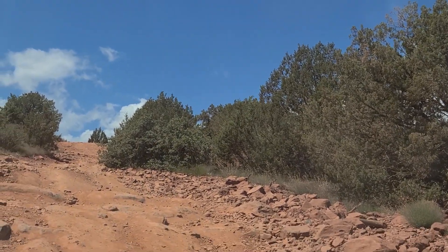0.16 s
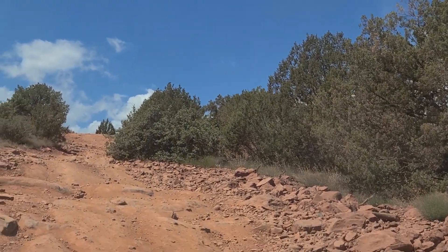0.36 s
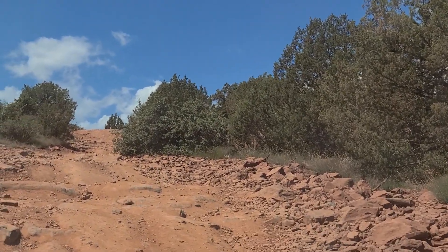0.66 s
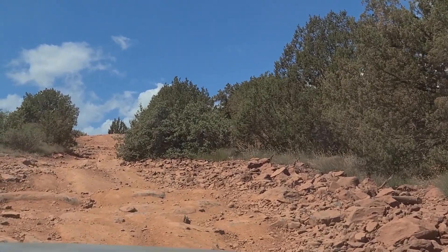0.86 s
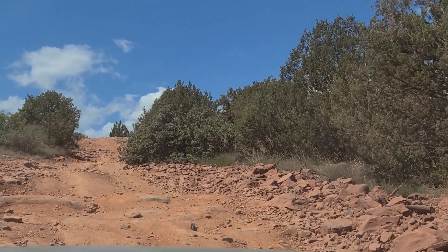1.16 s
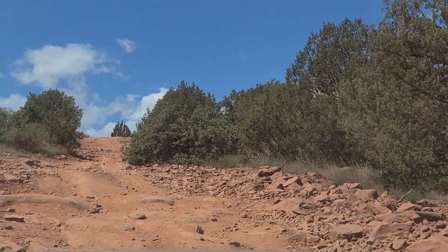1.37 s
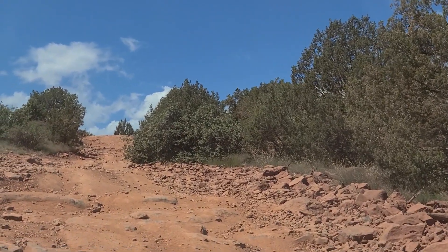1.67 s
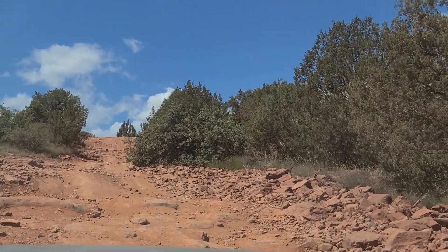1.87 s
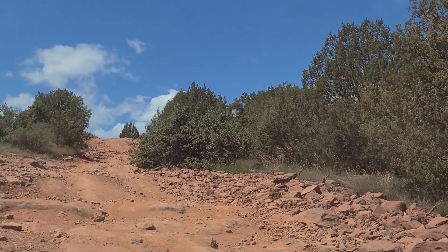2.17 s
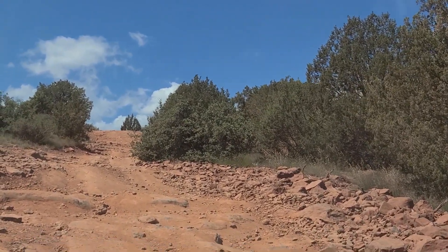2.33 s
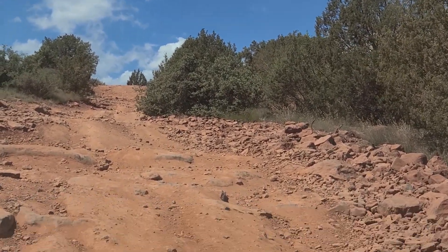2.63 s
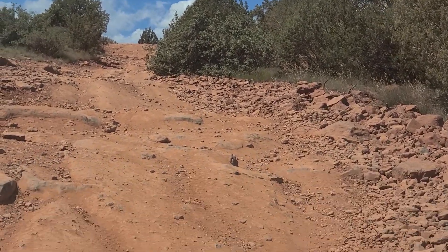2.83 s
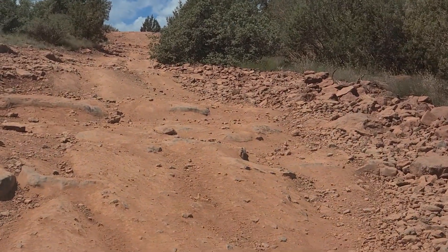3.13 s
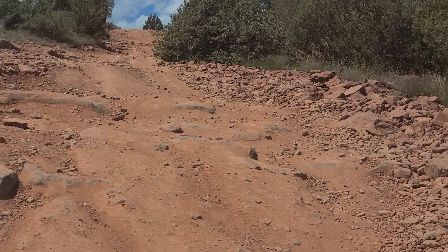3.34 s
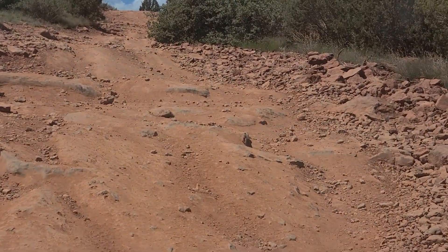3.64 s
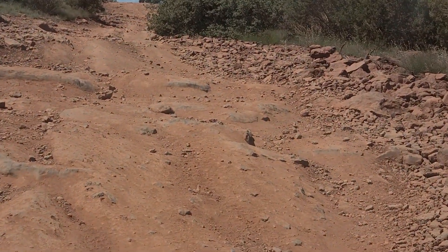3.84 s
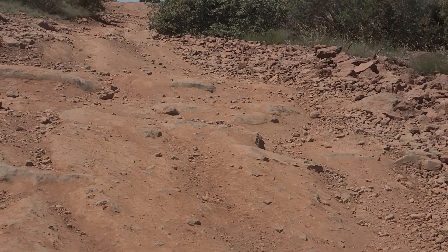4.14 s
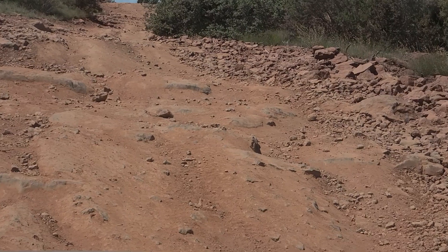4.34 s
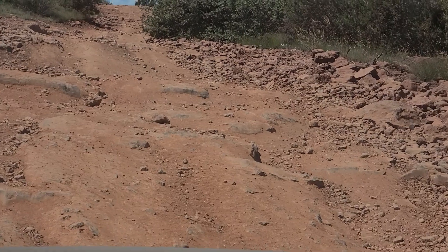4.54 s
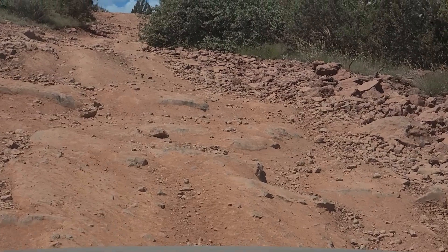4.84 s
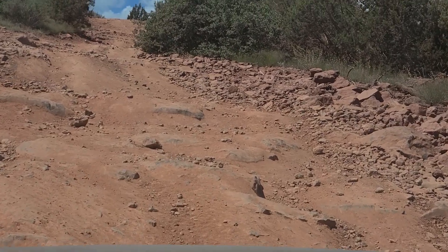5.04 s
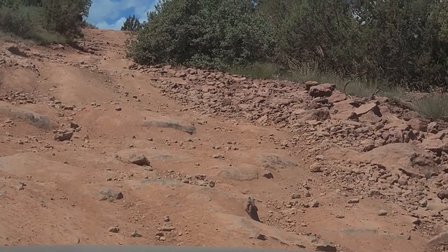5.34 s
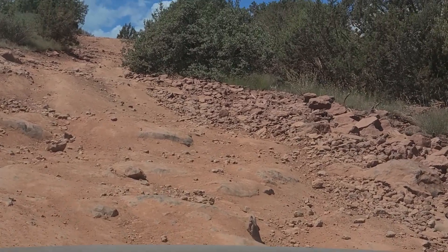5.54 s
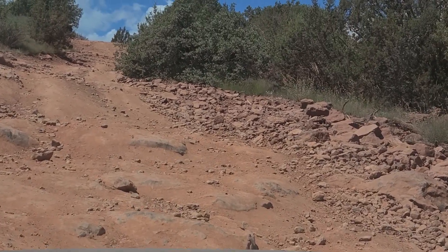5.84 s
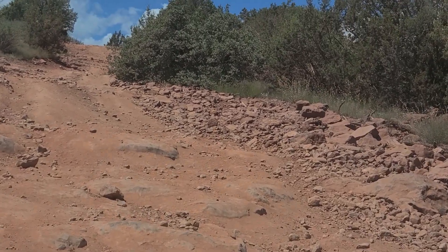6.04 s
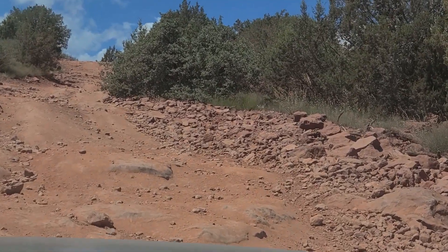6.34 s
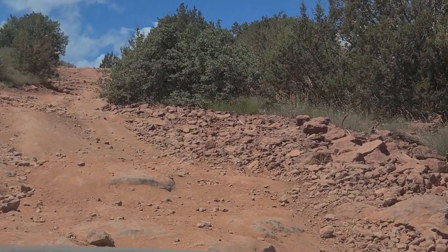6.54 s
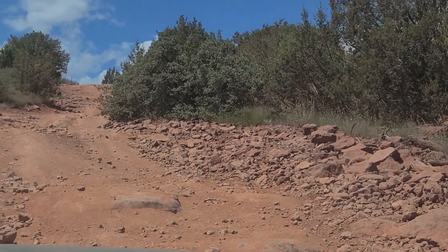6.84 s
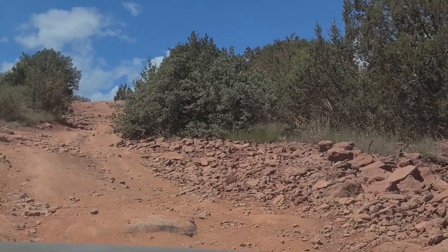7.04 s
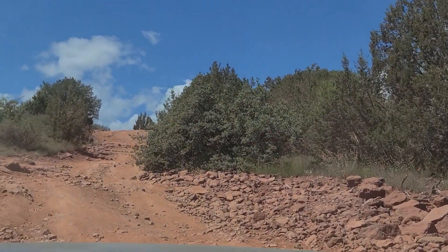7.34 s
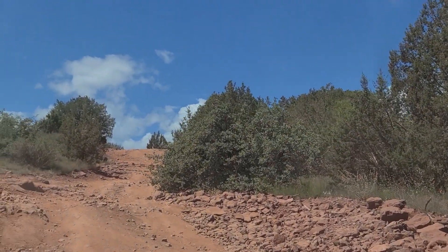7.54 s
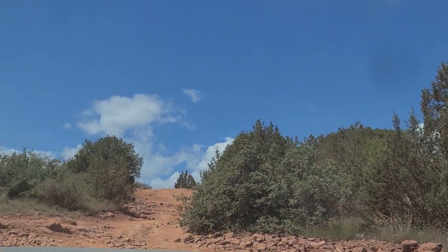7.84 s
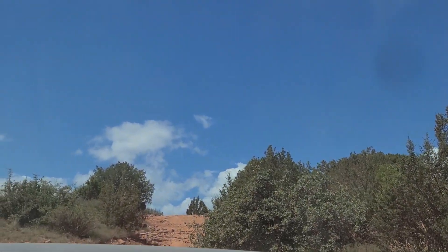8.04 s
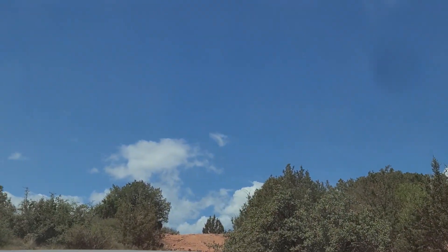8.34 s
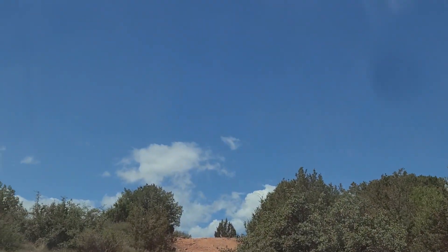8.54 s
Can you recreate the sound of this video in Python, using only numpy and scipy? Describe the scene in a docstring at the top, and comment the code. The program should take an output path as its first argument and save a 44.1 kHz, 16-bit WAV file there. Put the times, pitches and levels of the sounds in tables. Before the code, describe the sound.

Low engine hum climbs and falls as a truck crawls over rocky dirt, with gritty tyre crunch, cracking stones, hollow underbody knocks and faint rubber squeals.

```python
"""Truck crawling up a rocky trail

Heard by a camera inside the cab of a six-cylinder truck on a rocky dirt trail, left window open.
Sine tones on the crank orders and whines follow the engine; coloured noise makes the cab's deep heave
and drumming, and, modulated by dense pops, the tyres' crunch, hiss and whirr by the window.
Short decaying rings and noise bursts make cracking stones, pings, and knocks and bumps under the floor;
wavering sines squeal as rubber slips on rock."""
import sys
import numpy as np
from scipy import signal
from scipy.fft import rfft, irfft, next_fast_len
from scipy.io import wavfile
from scipy.ndimage import uniform_filter1d

SR = 44100
rng = np.random.default_rng(int(sys.argv[2]) if len(sys.argv) > 2 else 0)


def dump_mix(stems):
    """Bounce the given channels to the path in sys.argv[1] as a 16-bit WAV at rate SR."""
    frames = np.atleast_2d(stems).T  # one column per channel
    limited = np.clip(frames, -1, 1)  # hard clip at full scale
    pcm = np.round(limited * 32767).astype(np.int16)
    wavfile.write(sys.argv[1], SR, pcm)


N = 383669

# engine over the climb: t/s, firing rate f/Hz, firing tone level/dB, drive-line load level/dB
ENGINE_RUN = [(0.0, 50.77, -10, -6.5), (0.36, 53.24, -12, -4), (0.6, 51.77, -12, -7.5),
              (1.34, 55.57, -10.5, -3), (1.6, 60, -6, -1), (2.13, 61.66, -8.5, -3),
              (2.4, 61.27, -7.5, -2.5), (2.69, 63.66, -9.5, -4), (3.04, 61.93, -9, -3.5),
              (3.45, 64.07, -12, -6.5), (3.95, 64.35, -10, -5.5), (4.86, 71.34, -14, 0),
              (5.12, 71.8, -14.5, -3.5), (5.36, 70.4, -15, -7), (5.51, 67.93, -7.5, -4.5),
              (5.72, 63.96, -5, -4), (5.96, 60.76, -4.5, -14), (6.03, 57.9, -12, -1.5),
              (6.2, 50.46, -9, -8), (6.5, 42.74, -28, -2), (6.72, 40.74, -26, -5), (7.0, 40.58, -18, -4.5),
              (7.31, 37.64, -22, -5.5), (7.77, 35.35, -18, -6), (7.96, 36.88, -14.5, -4.5),
              (8.14, 37.33, -18, -4.5), (8.42, 35.03, -23, -5.5), (8.7, 34.6, -24, -6)]
# rolling over the trail: t/s, road noise level/dB, deep rumble level/dB
TRAIL = [(0.0, -0.5, -33), (1.1, 1, -24), (1.9, 2.5, -17), (2.6, 1, -20.5), (3.6, 3.5, -17.5),
         (4.0, 1, -25), (5.1, 2.5, -21.5), (5.7, 1.3, -17.5), (6.1, 0.5, -37), (6.9, -4, -24),
         (7.4, -4.5, -28), (7.9, -3.5, -46), (8.15, 1.5, -25), (8.7, -5, -27)]

# left minus right, dB
BASS_PAN_DB, CRUNCH_PAN_DB, HISS_PAN_DB, WHIRR_PAN_DB = 1.1, 6, 5, 1
# levels at road noise 0 dB, and dB gained for each dB of road noise
DRUM_DB, DRUM_SLOPE = -33.5, 0.79
CRUNCH_DB, CRUNCH_SLOPE = -50, 0.92
HISS_DB, HISS_SLOPE = -58, 1.4
WHIRR_DB, WHIRR_SLOPE = -44, 1.13
HIT_T = np.arange(int(.16 * SR)) / SR  # time axis of one blow, s


def undb(db):
    """dB to gain."""
    return 10 ** (np.asarray(db) / 20)


def curves(table):
    """Columns of a table, one value per sample."""
    s, *columns = np.transpose(table)
    return [np.interp(np.arange(N) / SR, s, c) for c in columns]


def on_log(hz, table):
    """A (Hz, value) table read on a log-frequency axis."""
    table_hz, values = np.array(table).T
    return np.interp(np.log(hz + 1), np.log(table_hz), values)


def walk(rate):
    """Random levels held 1 / rate s and smoothed twice; spread about 1.4."""
    k = int(SR / rate)
    held = np.repeat(rng.standard_normal(N // k + 1), k)
    return 1.83 * uniform_filter1d(uniform_filter1d(held, k), k)[:N]


def band(x, lo_hz, hi_hz):
    """Band-pass."""
    return signal.sosfilt(signal.butter(2, [lo_hz, min(hi_hz, .45 * SR)], "band", fs=SR, output="sos"), x)


def panned(pan_db):
    """Left and right gains, as a column."""
    return undb(np.array([[pan_db], [-pan_db]]) / 2)


def stereo(colour, lo_hz, hi_hz, grains=0):
    """Coloured noise at two ports, rms 1 from lo to hi: a shared part, late at the right, and unrelated parts."""
    # likeness of the two microphone ports: f/Hz, shared share of power (0-1)
    likeness = [(30, 0.98), (70, 1), (125, 0.85), (250, 0.99), (500, 0.78), (1200, 0.45), (3000, 0.03),
                (12000, 0.08)]
    port_lag = 19.7  # samples, shrinking below 400 Hz
    size = next_fast_len(N)
    hz = np.arange(size // 2 + 1) * SR / size
    shared, left, right = rfft(rng.standard_normal((3, N)) * (1 + grains), size)
    like = np.clip(on_log(hz, likeness), 0, 1)
    late = np.exp(-2j * np.pi * hz * port_lag / SR * np.clip(hz / 400, 0, 1))
    pair = np.sqrt(like) * shared * np.array([late ** 0, late])
    pair = pair + np.sqrt(1 - like) * np.array([left, right])
    pair = pair * undb(on_log(hz, colour))
    inside = (hz > lo_hz) & (hz < hi_hz)
    return irfft(pair, size)[:, :N] / irfft(pair * inside, size)[:, :N].std()


def cab_lift_db(hz):
    """Cab resonances lift a tone passing through them."""
    # cab resonances: f/Hz, width/Hz, level/dB
    resonances = [(68.7, 6.3, 13), (101, 7, 0), (125.4, 7.9, 5), (138.2, 12.5, 8), (166, 13, 6.5),
                  (185.7, 11.2, 7.5), (206.2, 8.1, 7.5), (243.4, 8.1, 2.5), (286, 15, 5), (355, 7, 7.5),
                  (426, 17, 9.5)]
    return sum(db / (1 + (2 * (hz - centre) / width) ** 2) for centre, width, db in resonances)


def crank_tone(k, db, hz):
    """A sine at k times the crank rate; uneven firings make it waver in level and phase."""
    crank = 2 * np.pi * np.cumsum(hz) / SR / 3  # three firings a turn
    phase = k * crank + rng.uniform(0, 2 * np.pi) + .15 * walk(5)
    skew = min(0.0015 * k ** 2, .45) * walk(1.5)  # higher orders reach the two ports differently
    waver_db = (1.2 if k < 22 else 1.4) * walk(6)
    tone = np.sin(phase + np.array([skew, -skew]))
    pan_db = BASS_PAN_DB + min(0.12 * k, 1.5) * (k > 3)
    return np.sqrt(2) * undb(db + waver_db) * tone * panned(pan_db)


def engine():
    """The firing tone and other crank orders, which follow load, lugging and the cab's resonances."""
    # multiples of the crank rate that sound beside the firing tone
    multiples = (2, 4, 4.5, 5, 6, 7, 8, 9, 10, 11, 12, 13, 14, 15, 16, 18, 20, 21)
    # for each multiple: level/dB, lift when the engine lugs/dB
    order_levels = [(-20.5, -0.5), (-30, 3.5), (-39.5, 14.5), (-28.5, -6), (-26.5, 8), (-40.5, 3.5),
                    (-30.5, -12), (-31.5, 4.5), (-37.5, -21), (-34.5, -3.5), (-32.5, 8.5), (-35, -5.5),
                    (-53.5, 7.5), (-37.5, 5), (-41.5, 1), (-51.5, 12.5), (-52.5, 21.5), (-42.5, 5)]
    lug_below_hz, lug_range_hz = 57.6, 19.7  # firing rate where lugging begins, and how far down it is full
    firing_load = 1.48  # multiples of the firing rate follow the load this much more steeply
    hz, firing_db, load_db = curves(ENGINE_RUN)
    lug = np.clip((lug_below_hz - hz) / lug_range_hz, 0, 1)
    out = crank_tone(3, firing_db, hz)
    for k, (db, lug_db) in zip(multiples, order_levels):
        load_share = 1 if k % 3 else firing_load
        level_db = db + lug_db * lug + load_db * load_share + cab_lift_db(k * hz / 3)
        out += crank_tone(k, level_db, hz)
    return out


def whines():
    """Belt and gear whines at high crank multiples, louder as the engine speeds up."""
    # whines: multiple of the crank rate, level/dB at 65 firings a second, lift while the revs fall/dB
    whine_table = [(24, -50, 0), (28, -51, 0), (36, -54, 0), (40, -51, 5), (45, -63, 13), (48, -60, 0),
                   (54, -55.5, 0), (60, -58, 8)]
    whine_db_per_hz = .18  # per Hz of firing rate
    overrun_hz_per_s = 18  # fall of the firing rate at which the lift is full
    hz = curves(ENGINE_RUN)[0]
    slope = uniform_filter1d(np.gradient(hz) * SR, SR // 10)
    overrun = np.clip(-slope / overrun_hz_per_s, 0, 1)
    out = np.zeros((2, N))
    for k, db, overrun_db in whine_table:
        level_db = db + whine_db_per_hz * (hz - 65) + overrun_db * overrun + cab_lift_db(k * hz / 3)
        out += crank_tone(k, level_db, hz)
    return out


def body():
    """The cab heaves in the deep bass and its panels drum with road and exhaust noise."""
    # deep colour: f/Hz, level/dB per Hz
    heave_colour = [(8, -65), (17, -24), (24, -5), (33, -6), (44, -4.5), (53, -2), (66, -14), (80, -14),
                    (120, -75)]
    # drumming colour: f/Hz, level/dB per Hz
    drum_colour = [(47, -8), (80, -10), (112, -16.5), (161, -15), (240, -17), (310, -21), (388, -20.5),
                   (602, -27), (773, -26.5), (1020, -36), (1230, -31), (1600, -50), (2080, -64),
                   (3520, -120)]
    road_db, deep_db = curves(TRAIL)
    deep = stereo(heave_colour, 20, 45) * undb(deep_db) * panned(BASS_PAN_DB)
    drum_db = DRUM_DB + DRUM_SLOPE * road_db + 0.54 * walk(20)
    drum = stereo(drum_colour, 300, 900) * undb(drum_db) * panned(1.3)
    return deep + drum


def tyres():
    """Dense grit crushed under the tread, as noise swelled by decaying pops, over a steadier whirr."""
    # crunch colour: f/Hz, level/dB per Hz
    crunch_colour = [(1060, -28.5), (1800, -10), (1870, -13.5), (2840, -4), (3190, -3.5), (3490, -3),
                     (5470, -6), (8500, -27), (11000, -40), (18700, -120)]
    # bright hiss colour: f/Hz, level/dB per Hz
    hiss_colour = [(4120, -15), (7000, 0.5), (8030, -17.5), (8760, -9), (11500, -3.5), (14400, -5.5),
                   (15600, -10.5)]
    # whirr colour: f/Hz, level/dB per Hz
    whirr_colour = [(590, -39), (1000, -28.5), (1330, -1), (1520, -4.5), (1870, -3.5), (2970, -7.5),
                    (3100, -10), (6840, -28), (8000, -37.5), (10400, -69), (17600, -120)]
    crunch_gain, hiss_gain, whirr_gain = tyre_gains()
    # 120 pops a second on average, each dying away over 21 ms
    pops = (rng.random(N) < 120 / SR) * undb(np.minimum(3 * rng.exponential(1, N), 9))
    grains = signal.lfilter([1], [1, -np.exp(-1 / (0.021 * SR))], 0.1 * pops)
    flicker_db = 0.4 * walk(15)
    # the limits in Hz are the bands in which the levels hold
    crunch = stereo(crunch_colour, 3500, 7000, grains) * crunch_gain * undb(flicker_db)
    hiss = stereo(hiss_colour, 9000, 15500, grains) * hiss_gain * undb(flicker_db + 0.6 * walk(11))
    whirr = stereo(whirr_colour, 1100, 2600, grains) * whirr_gain * undb(0.42 * walk(12))
    return crunch * panned(CRUNCH_PAN_DB) + hiss * panned(HISS_PAN_DB) + whirr * panned(WHIRR_PAN_DB)


def fade(t60, rise=.0006):
    """A blow's envelope: a rise (time constant, s), then a decay of 60 dB in t60 s."""
    return np.exp(-np.log(1000) * HIT_T / t60) * (1 - np.exp(-HIT_T / rise))


def peaked(x):
    """Scales a sound to peak 1."""
    return x / np.abs(x).max()


def add(out, s, sound, db, pan_db):
    """Places a sound at s seconds with its peak level, before panning, in dB."""
    i = int(s * SR)
    sound = sound[:, :N - i]
    out[:, i:i + sound.shape[1]] += peaked(sound) * undb(db) * panned(pan_db)


def cracks():
    """Stones crack under the tread: short bursts of noise with a brighter part."""
    # cracks: t/s, peak level/dB, centre f/Hz, bright part level/dB
    crack_table = [(0.15, -27.5, 3140, -50), (0.556, -26.5, 3670, -32), (1.361, -31.5, 3350, -54),
                   (1.4293, -40, 2460, -47), (1.6404, -18, 3700, -23), (1.8305, -22, 3300, -58),
                   (2.3228, -33, 2420, -52), (3.309, -35, 2929, -29), (3.431, -30, 2010, -48),
                   (4.3303, -24, 2054, -49), (4.4323, -25.5, 4570, -45), (4.519, -41, 2547, -31),
                   (5.206, -24.5, 2426, -54), (5.7489, -35, 2190, -53), (5.9296, -40, 2130, -31),
                   (6.047, -28, 4260, -45), (6.096, -33, 3070, -38), (6.5994, -45, 2050, -38),
                   (6.8908, -24, 2804, -23), (7.0946, -30, 3438, -24), (7.119, -32, 2474, -40),
                   (8.0411, -23, 4000, -32), (8.263, -25, 3310, -54)]
    out = np.zeros((2, N))
    for s, db, hz, bright_db in crack_table:
        puff = rng.standard_normal((2, 2, len(HIT_T)))
        add(out, s, band(puff[0], 0.6 * hz, 1.44 * hz) * fade(0.092), db, CRUNCH_PAN_DB)
        add(out, s, band(puff[1], 8100, 20000) * fade(0.043, 0.0021), bright_db, HISS_PAN_DB)
    return out


def tyre_gains():
    """Gains of crunch, hiss and whirr: the road's share plus, in power, each uneven slip or grind."""
    # a wheel slips on grit: start t/s, length/s, crunch level/dB, bright hiss level/dB
    slip_table = [(0.375, 0.21, -52, -57), (1.398, 0.1, -51, -49.5), (1.52, 0.15, -46, -43.5),
                  (1.82, 0.29, -49.5, -58), (3.221, 0.086, -47, -55), (3.414, 0.21, -37, -43.5),
                  (3.64, 0.18, -48.5, -58), (4.328, 0.21, -47, -50.5), (4.68, 0.21, -48.5, -58),
                  (5.69, 0.069, -56, -52), (6.03, 0.22, -44, -48.5), (6.753, 0.19, -48, -50),
                  (6.966, 0.23, -48, -61), (7.074, 0.042, -36.5, -38.5), (7.133, 0.24, -45.5, -55),
                  (7.582, 0.08, -65, -60), (7.96, 0.065, -52, -70), (8.102, 0.28, -50.5, -70)]
    # coarse gravel grinds under a wheel: start t/s, length/s, level/dB
    grind_table = [(7.56, .14, -52.5), (7.847, 0.11, -49.5), (7.995, 0.082, -44), (8.11, 0.061, -42)]
    attack_s, release_s = 0.024, 0.033
    gritty_db, gritty_rate = 1.1, 140  # scale of the unevenness, changes a second
    t, road_db = np.arange(N) / SR, curves(TRAIL)[0]
    steady_db = [CRUNCH_DB + CRUNCH_SLOPE * road_db,
                 HISS_DB + HISS_SLOPE * road_db,
                 WHIRR_DB + WHIRR_SLOPE * road_db]
    power = undb(steady_db) ** 2
    grip = undb(gritty_db * np.array([scale * walk(gritty_rate) for scale in (1, 1, 2.5)]))

    def shape(start, length):
        """Straight attack, hold, and straight release after the length."""
        release = 1 + (start + length - t) / release_s
        return np.clip(np.minimum((t - start) / attack_s, release), 0, 1)

    for start, length, *db in slip_table:
        power[:2] += (np.outer(undb(db), shape(start, length)) * grip[:2]) ** 2
    for start, length, db in grind_table:
        power[2] += (undb(db) * shape(start, length) * grip[2]) ** 2
    return np.sqrt(power)


def ring_modes(modes, detune, gains_db, rise):
    """Sum of decaying sines, detuned apart at each port, all starting together."""
    return sum(undb(g) * np.sin(2 * np.pi * f * d * HIT_T) * fade(t60, rise)
               for (f, _, t60), d, g in zip(modes, detune, gains_db))


def knocks():
    """Stones and suspension ring the floor modes nearest each knock's centre, and rattle on."""
    # knocks: t/s, peak level/dB, centre f/Hz, upper ring level/dB, left minus right/dB
    knock_table = [(.738, -26.5, 800, -22.5, 3), (1.109, -14, 389.6, -43, 0),
                   (1.158, -7.5, 432.6, -21.5, -1.5), (1.935, -9, 426, -26, 2), (2.623, -22, 666.5, -51, 2),
                   (2.824, -22, 454, -30, 8), (2.83, -17, 420, -31, 5), (2.839, -16, 420, -40, 0),
                   (2.853, -14, 463, -38, 6), (2.867, -18, 400, -36, 6), (2.879, -15, 399.8, -28, 6),
                   (2.956, -19, 899, -21.5, 2.5), (3.371, -13.5, 420, -44, 13), (3.399, -18, 670, -38, 0),
                   (4.0, -22, 480.6, -45, 0), (4.067, -19, 500, -45, 0), (4.334, -16.5, 449.7, -30, 2),
                   (4.529, -22, 521, -45, 0), (5.361, -27, 692.2, -44, 3), (6.503, -8, 394.1, -34, 2.5),
                   (6.68, -42, 1286, -30.5, 6), (6.954, -29, 800, -35, 1), (7.001, -19, 560, -28, 2.5),
                   (7.158, -13, 378, -46, 3), (7.573, -32, 700, -44, 1), (7.65, -22, 408, -48, 8),
                   (7.791, -27.5, 749, -49, 3), (7.848, -33, 699.4, -44, 3), (8.103, -25, 299.3, -40, 4),
                   (8.136, -16.5, 506.6, -32, 5), (8.26, -25, 417, -31, -3), (8.485, -27.5, 664, -51, 7)]
    # modes of the floor: f/Hz, level/dB, t60/s
    floor_modes = [(360, 1.5, 0.044), (428, -5, 0.09), (529, -17, 0.16), (651, -8, 0.18), (800, -12, 0.18),
                   (1233, -6, 0.087), (1324, -16, 0.066)]
    # what the stone's edge rings with: f/Hz, level/dB, t60/s
    edge_modes = [(1270, -1, 0.084), (1940, 0, .04), (2486, -0.5, 0.044)]
    blow_rise_s = .002
    out = np.zeros((2, N))
    for s, db, hz, upper_db, pan_db in knock_table:
        detune = 1 + 0.062 * rng.standard_normal((len(floor_modes), 2, 1))
        puff = rng.standard_normal((2, 2, len(HIT_T)))
        floor_db = [g - 12.8 * abs(np.log2(f / hz)) for f, g, _ in floor_modes]
        ring = ring_modes(floor_modes, detune, floor_db, blow_rise_s)
        rattle = band(puff[0], 0.65 * hz, 1.25 * hz) * fade(0.17, 0.004)
        # the blow itself: a swing that falls 60 dB in four cycles
        thud = np.sin(2 * np.pi * hz * HIT_T) * fade(4 / hz, blow_rise_s)
        low = -peaked(ring) - .8 * thud / thud.max() + 0.45 * peaked(rattle)
        add(out, s, low, db, pan_db)
        edge = ring_modes(edge_modes, detune, [g for _, g, _ in edge_modes], .0006)
        scrape = band(puff[1], 1300, 2600) * fade(0.12, 0.00022)
        add(out, s, peaked(edge) + 0.68 * peaked(scrape), upper_db, pan_db)
    return out


def pings():
    """Small stones ping off metal: two close decaying rings at each port."""
    # pings: t/s, peak level/dB, f/Hz
    ping_table = [(.749, -30, 2500), (2.963, -28, 1350), (5.811, -37, 2350), (5.823, -32.5, 2600),
                  (5.876, -26.5, 1830), (6.968, -37, 2400), (7.412, -37, 1298), (7.784, -34, 1316),
                  (7.94, -40, 2100), (8.012, -38, 1996), (8.16, -35, 1400)]
    out = np.zeros((2, N))
    for s, db, hz in ping_table:
        pair = hz * (1 + .025 * rng.standard_normal((2, 2, 1)))
        add(out, s, np.sin(2 * np.pi * pair * HIT_T).sum(axis=0) * fade(.048, .0015), db, 2)
    return out


def bumps():
    """Dull, round bumps of the suspension: low sines that die quickly."""
    # bumps: t/s, peak level/dB, f/Hz
    bump_table = [(2.838, -11.5, 176), (5.198, -26, 110.8), (6.02, -10.5, 166), (7.114, -7.5, 139),
                  (8.021, -21, 139), (8.118, -14, 145), (5.26, -18, 200), (8.001, -21, 284),
                  (8.11, -20, 212)]
    out = np.zeros((2, N))
    for s, db, hz in bump_table:
        add(out, s, np.sin(2 * np.pi * hz * HIT_T) * fade(0.057, 0.006) * np.ones((2, 1)), db, 1.5)
    return out


def squeals():
    """Rubber squeals on rock: a wandering sine, part steady and part fluttering in level."""
    # squeals: start t/s, end t/s, f/Hz, width/Hz, level/dB
    squeal_table = [(3.5, 3.61, 3450, 200, -46), (3.58, 3.76, 2969, 200, -44),
                    (6.0, 6.439, 3049, 219.7, -51), (6.021, 6.3, 2350, 250, -54),
                    (6.15, 6.27, 4850, 300, -52), (7.158, 7.42, 3360, 200, -47),
                    (7.199, 7.419, 2624, 298, -56), (8.242, 8.5, 3305, 200.1, -49)]
    wander, fade_share, steady = .007, .2, .8  # pitch share; rise and fall by length; tone against noise
    t = np.arange(N) / SR
    out = np.zeros((2, N))
    for start, end, hz, width, db in squeal_table:
        pitch = hz * (1 + wander * walk(17))
        flutter = uniform_filter1d(rng.standard_normal((2, N)), int(SR / width))
        ring = (steady + flutter / flutter.std()) * np.sin(2 * np.pi * np.cumsum(pitch) / SR)
        ring = ring / ring.std() * undb(1.8 * walk(45))  # the rubber grips and lets go
        ends = np.minimum(t - start, end - t) / (fade_share * (end - start))
        out += ring * undb(db) * np.clip(ends, 0, 1)
    return out * panned(CRUNCH_PAN_DB)


def scene():
    """All sources, with a 3 ms fade at both ends."""
    t = np.arange(N) / SR
    mix = engine() + whines() + body() + tyres() + cracks() + knocks() + pings() + bumps() + squeals()
    return mix * np.clip(np.minimum(t, t[-1] - t) / .003, 0, 1)


def record(dry):
    """The camera rounds the loudest peaks and cuts the top above 15770 Hz."""
    rounded = np.tanh(.92 * dry) / .92
    return signal.sosfilt(signal.ellip(14, .2, 90, 15770, fs=SR, output="sos"), rounded)


dry = scene()
out = record(dry)
dump_mix(out)
```